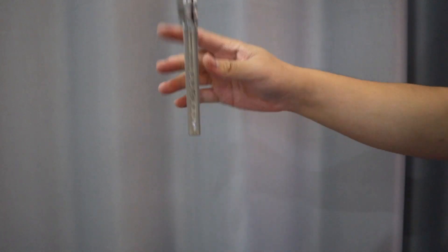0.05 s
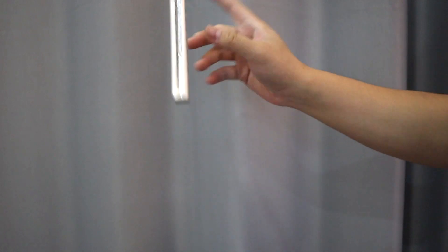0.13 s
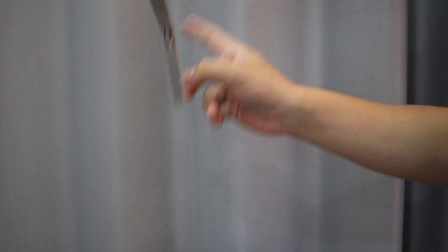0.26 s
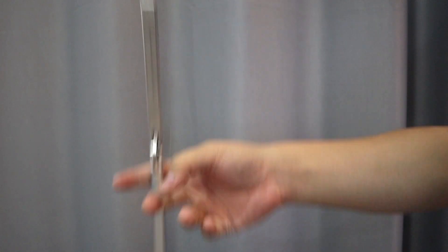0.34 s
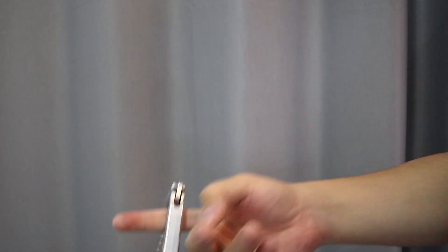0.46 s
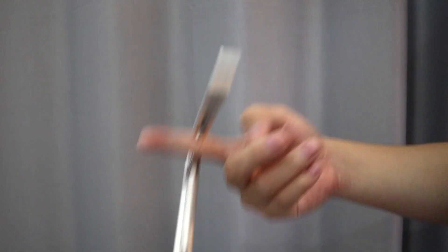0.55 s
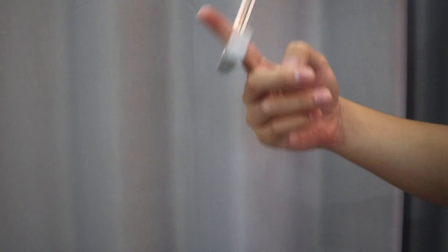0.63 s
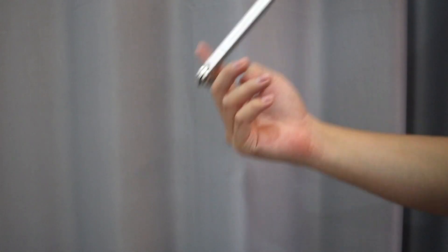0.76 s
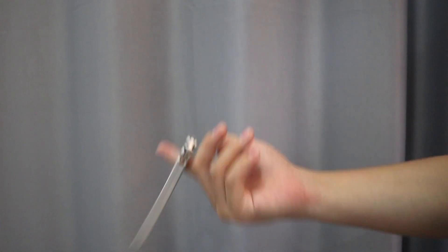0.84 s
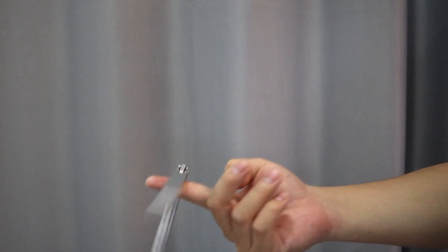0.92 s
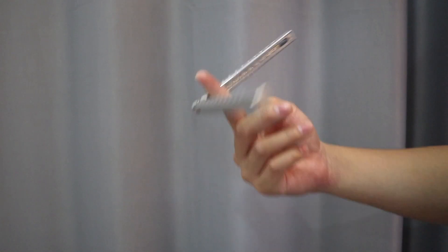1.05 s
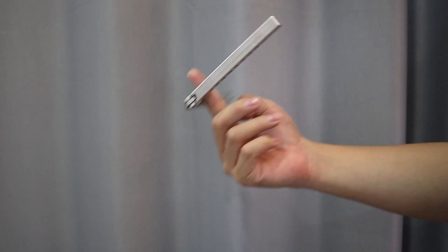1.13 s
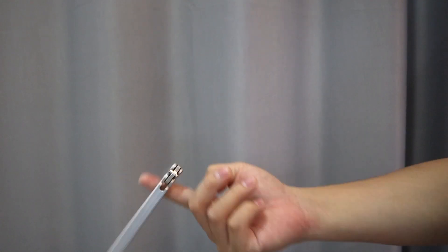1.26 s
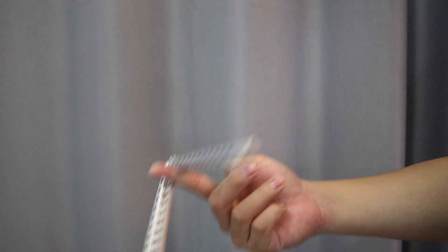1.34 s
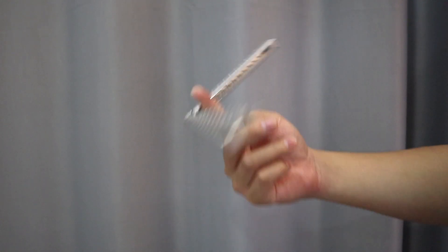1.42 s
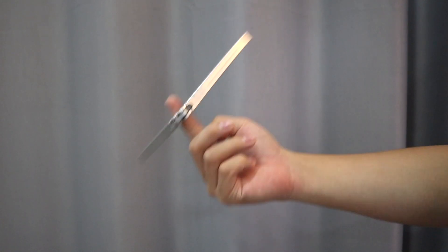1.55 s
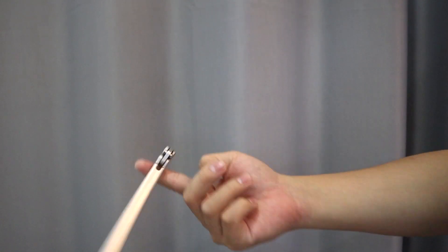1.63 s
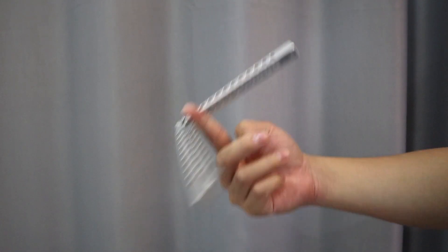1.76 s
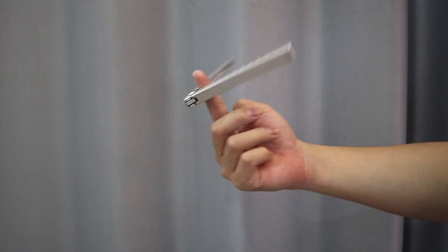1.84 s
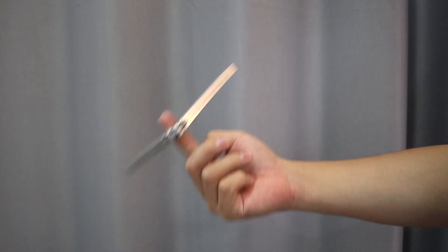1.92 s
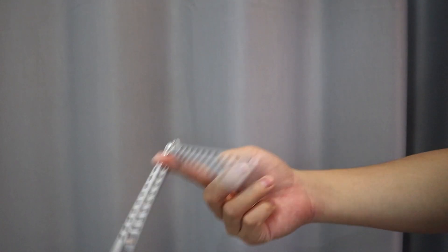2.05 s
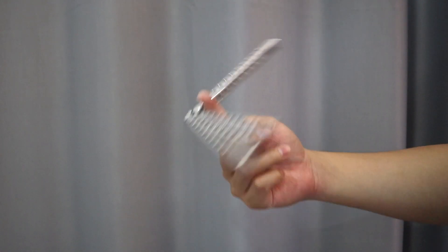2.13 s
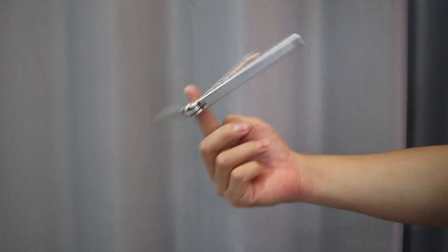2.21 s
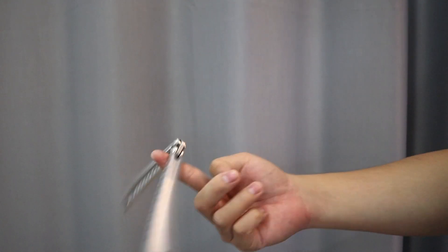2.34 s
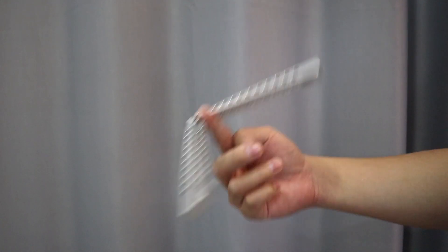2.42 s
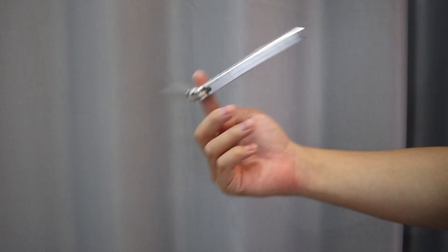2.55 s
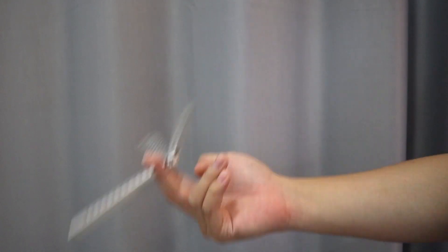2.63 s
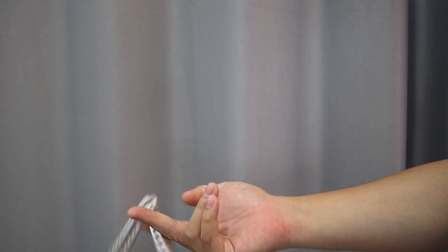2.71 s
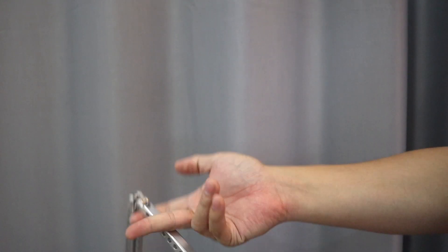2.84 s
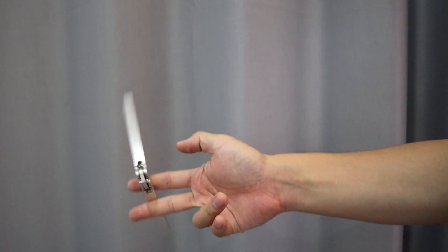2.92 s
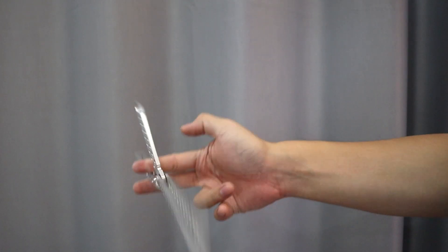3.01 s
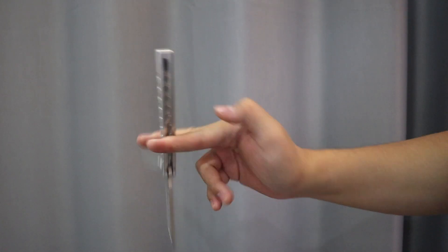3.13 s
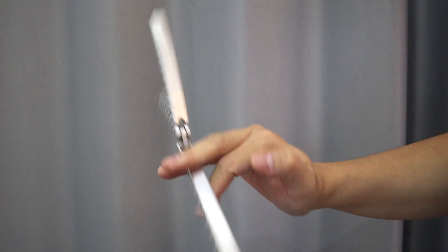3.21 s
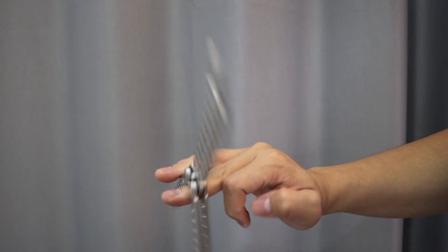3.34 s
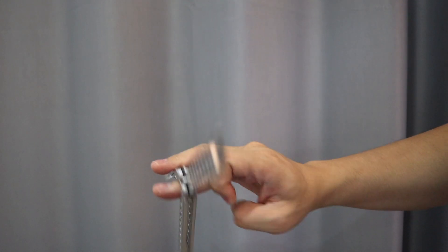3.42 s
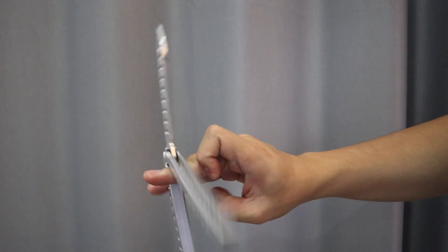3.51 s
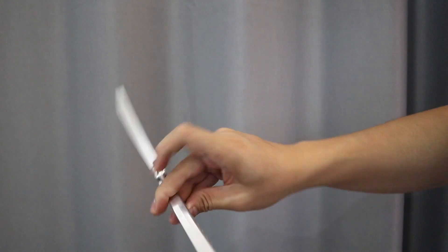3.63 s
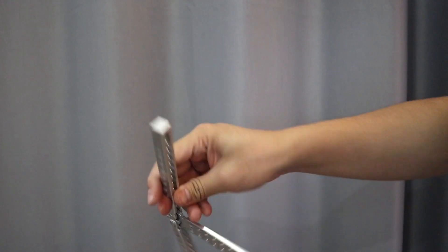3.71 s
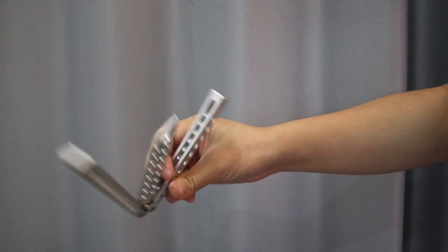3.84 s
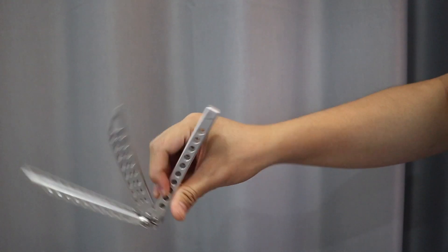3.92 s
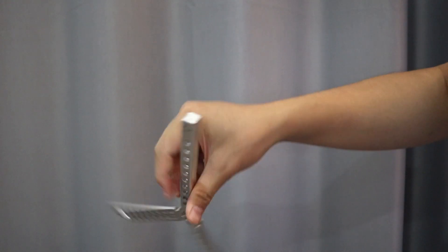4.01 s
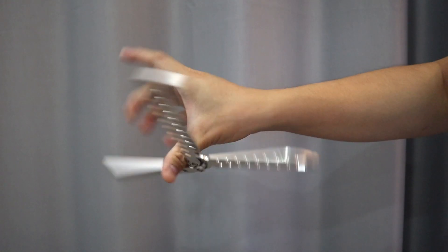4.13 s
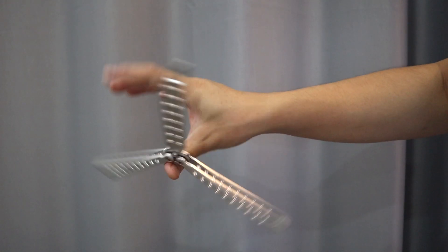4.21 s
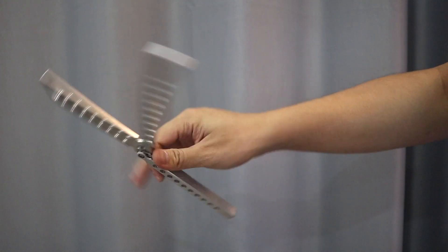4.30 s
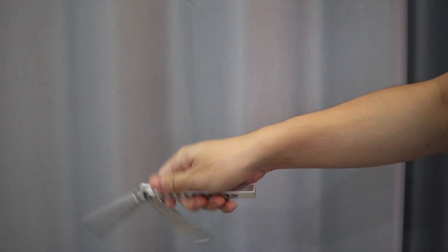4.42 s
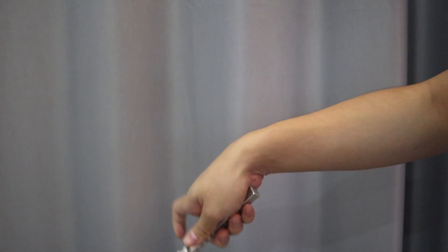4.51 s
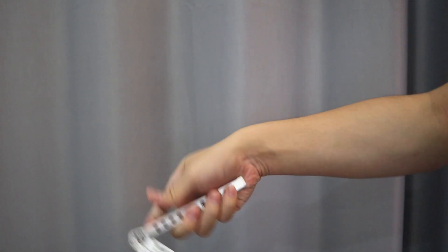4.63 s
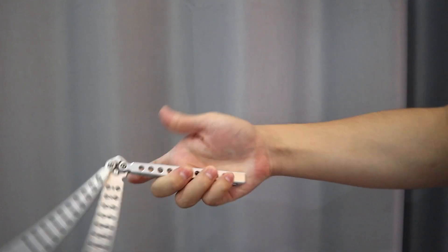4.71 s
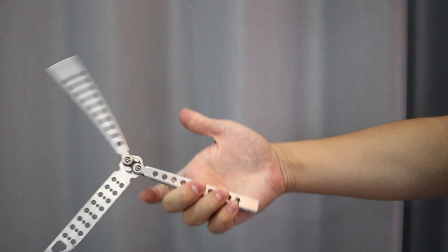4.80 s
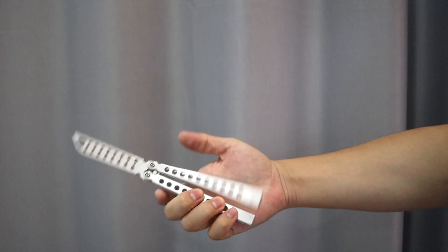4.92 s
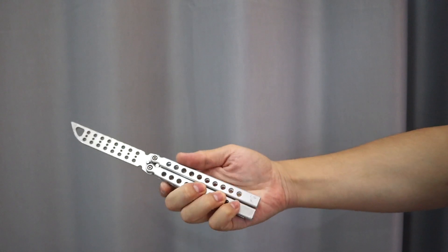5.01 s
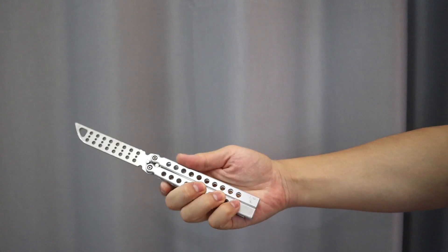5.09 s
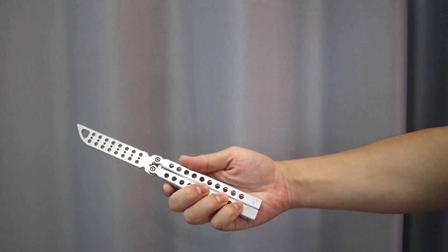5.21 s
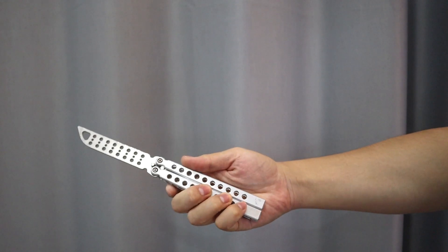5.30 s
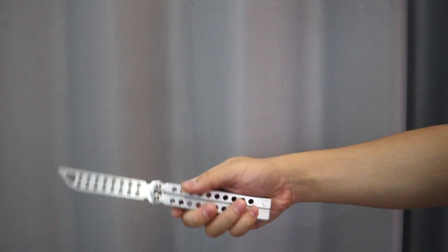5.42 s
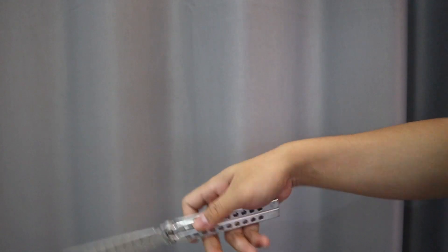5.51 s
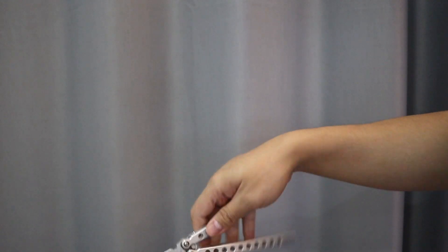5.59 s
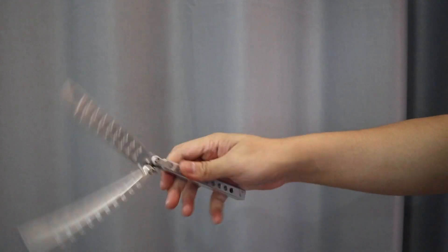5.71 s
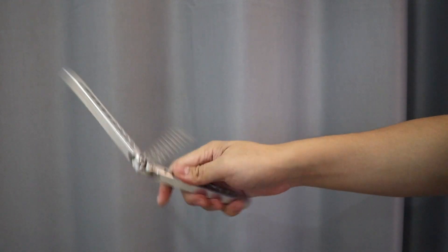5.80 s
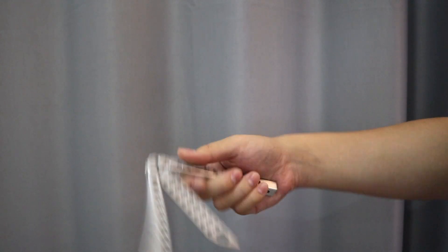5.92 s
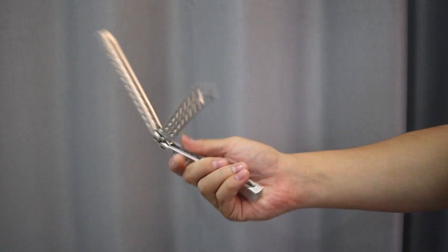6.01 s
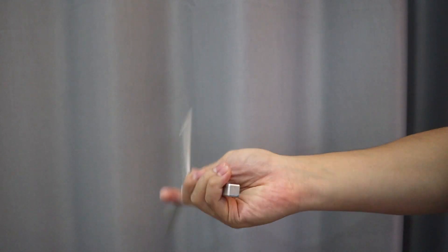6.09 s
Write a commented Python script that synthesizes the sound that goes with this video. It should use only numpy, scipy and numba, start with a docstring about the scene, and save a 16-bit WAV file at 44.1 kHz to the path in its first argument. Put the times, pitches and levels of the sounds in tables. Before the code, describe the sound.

Close, dry metallic clatter in a curtained room: handles, blade and pins of a folding knife strike with crisp clacks and very short high rings, pivots jingling loosely between. Loud hits alternate with faint ticks and gaps. A soft airy swish precedes later clicks, a clattering close settles near five seconds, and quieter clacks end it. The background is low rumbling air, wavering hum and hiss, ducking under the loudest hits.

```python
"""A curtained room, where a steel folding knife is spun round a finger close to a camera.
Handles, blade and stop pins strike each other and ring as sums of damped modes; loose pivots rattle.
The room prolongs the ring with a tail of decaying noise bands.
Behind lie a fan hum (a wavering sine), far traffic, airy swishes and hiss (filtered noise).
The camera's limiter ducks everything at loud clacks."""
import sys
import numpy as np
from scipy import signal
from scipy.fft import rfft, irfft
from scipy.io import wavfile
from scipy.ndimage import uniform_filter1d
from numba import njit

SR = 44100
rng = np.random.default_rng(int(sys.argv[2]) if len(sys.argv) > 2 else 0)


def unload_audio(sound):
    """Save the sound as a 16-bit wav file, at the path given as the first command line argument."""
    columns = np.transpose(np.atleast_2d(sound))
    # keep every value between -1 and 1, then stretch to whole-number steps
    steps = np.round(np.clip(columns, -1, 1) * 32767)
    wavfile.write(sys.argv[1], SR, steps.astype(np.int16))


N = 271215  # samples

# Vibration modes of the knife, one list per part: finger-damped knock, handle bending, blade bending,
# bright ring of the handles, pins and drilled webs.
# (frequency [Hz], relative level [dB], 60 dB decay time before stretching [s])
PART_MODES = [
    [(700, -12, .005), (1300, -2, .008), (1550, 0, .008), (2200, -10, .006)],
    [(3050, -5, .012), (3380, 0, .018), (3500, -1, .02), (3800, -5, .012), (4200, -8, .012)],
    [(4500, -8, .008), (5100, -3, .014), (5420, 0, .022), (5750, -3, .014), (6200, -12, .008),
     (6900, -12, .01)],
    [(7630, -18, .02), (8470, 0, .035), (8550, -2, .035), (8800, -16, .015)],
    [(9600, -8, .02), (10600, -5, .02), (11530, -4, .025), (12560, -3, .025), (12880, 0, .03),
     (14500, -6, .02), (15050, -5, .02)],
]
# Noise band of each part's grating contact: (lower edge [Hz], upper edge [Hz])
PART_BANDS = [(1100, 1900), (2800, 4400), (4700, 6300), (7500, 9300), (9300, 13800)]
CHATTER_MS, FREE_CHATTER_MS = 1.3, 3.5  # in a full grip; added as the handles come free
BLOW_TRIM_DB = -5.0


def blows():
    """Impact excitation: a chatter of contacts drives the modes; a free part rings, a gripped one grates."""
    out = np.zeros(N + SR)
    t = np.arange(SR // 12) / SR
    starts, levels, freedoms, _ = strikes()
    mode_chance = rng.standard_normal((len(starts), len(PART_MODES), 8, 2))
    bounces = rng.random((len(starts), 12, 2))
    grit = [level(band(rng.standard_normal(N + SR), *edges), 0) for edges in PART_BANDS]
    first = SR // 250  # levels refer to the first 4 ms
    build_up = 1 - np.exp(-t / 0.00029)  # contact takes a moment to build
    for at, parts, freedom, chances, bounce in zip(starts, levels.T, freedoms.T, mode_chance, bounces):
        chatter_s = np.clip(CHATTER_MS + FREE_CHATTER_MS * freedom[0], .5, 6) / 1000
        delay, strength = bounce.T
        contact_at = (delay * 2 * chatter_s * SR).astype(int)
        contact_gain = (2 * strength - 1) * np.exp(-1.5 * delay)
        for db, modes, chance, noise, free in zip(parts, PART_MODES, chances, grit, freedom):
            contacts = np.zeros(len(t))
            contacts[contact_at] = contact_gain * (1 - free)
            contacts[0] = 1
            tone = free * signal.fftconvolve(contacts, ring(modes, t, 2.92 * free, chance))[:len(t)]
            scrape = 0.49 * (1 - free) ** 2 * np.exp(-t / (1.9 * chatter_s))
            click = 1.13 * np.exp(-t / 0.00043)
            grate = noise[at:at + len(t)] * (scrape + click)
            hit = (tone + grate) * build_up
            out[at:at + len(t)] += undb(db + BLOW_TRIM_DB) * hit / np.sqrt(np.mean(hit[:first] ** 2))
    # so small a body radiates little bass
    return signal.sosfilt(signal.butter(2, 500, "highpass", fs=SR, output="sos"), out[:N])


def ring(modes, t, stretch, chance):
    """Modal superposition: damped sines, each a little off pitch and level as the grip changes."""
    hz, db, t60 = np.transpose(modes)[:, :, None]
    pitch_chance, level_chance = chance[:len(modes), :1], chance[:len(modes), 1:]
    pitch_spread, spread_db = .002, 2.8
    waves = np.sin(2 * np.pi * hz * (1 + pitch_spread * pitch_chance) * t)
    decay = np.exp(-np.log(1000) * t / (t60 * stretch))
    gains = undb(db + spread_db * level_chance)
    return np.sum(gains * waves * decay, axis=0) / np.sqrt(np.sum(undb(db) ** 2))


# Blows of the knife; levels are relative and are trimmed or combined when played:
# (time [s], knock level [dB], handle bending level [dB], bright ring level [dB],
#  freedom to ring [0-1], jangle level against the blow [dB])
BLOW_TABLE = [(0.355, -52, -36, -61, 0.6, -24), (0.3856, -45, -25, -29, 0.36, -25),
              (0.39, -41, -26.5, -23.5, .3, -5), (0.4159, -50, -42, -48, 0.4, -19),
              (0.4322, -22.5, -11, -7.5, 0.31, -30), (0.513, -55, -50, -38, .25, -24),
              (0.5517, -22, -21, -22, 0.46, -40), (0.5572, -26, -20, -33, 0.3, -34),
              (0.5711, -34, -17, -24, 0.1, -31), (0.5801, -16, 0, 7, 0.47, -25),
              (0.605, -45, -26, -8, 0.22, -20), (0.645, -57, -44, -21.5, 0.83, -9),
              (0.655, -51, -31, -24, 0.27, -7), (0.8002, -45, -16.5, -4, 0.52, -50),
              (1.1788, -29, -33, -38.5, 0.8, -11), (1.4619, -39, -19, -18.5, 0.21, -17),
              (1.5448, -42, -27.5, -24, 0.25, -11), (1.6367, -57, -35.5, -36, 0.5, -15),
              (1.6662, -45, -23.5, -25.5, 0.21, -4.5), (1.6836, -53, -9.5, -1, .63, -46),
              (1.7002, -67, -40, -15.5, 0.27, 2.5), (1.8227, -41, -34, -33, 0.2, -17),
              (1.8321, -40, -25.5, -23.5, 0.52, -15), (1.902, -46, -31.5, -21, 0.33, -33),
              (2.0034, -37, -31, -20, 0.2, -24), (1.9875, -56, -46, -37, 0.2, -25),
              (2.0078, -41, -7, 0.8, 0.65, -37.5), (2.022, -53.5, -29, -14, 0.5, -25),
              (2.0303, -62, -47, -12.5, 0.67, -13.5), (2.144, -51, -39, -51, 0, -18),
              (2.1857, -38, -22.5, -21.5, 0.3, -24), (2.251, -48, -30, -32, 0.25, -25),
              (2.4036, -37, -33.5, -33, .4, -32), (2.4258, -35, -18, -10.5, 0.22, -34),
              (2.429, -33, -22, -22, .5, -20), (2.4328, -38, -3, 0.5, .5, -43),
              (2.4833, -22.5, -10, 5.5, 0.43, -22.5), (2.574, -44, -31.5, -33, 0.16, -14),
              (2.625, -37.5, -41, -38, 0.2, -13), (2.716, -36, -29, -30.5, 0.42, -15),
              (2.7374, -48, -46, -42, .3, -21.5), (2.765, -42, -30, -31, 0.2, -7),
              (2.7724, -43, -25, -35, 0.27, -12), (2.7771, -52, -11.5, -3, 0.53, -25),
              (2.8312, -51, -21, -9, .48, -34), (2.9572, -51, -38.5, -32.5, 0, -9),
              (3.059, -50, -46, -42, .25, -24.5), (3.087, -40, -44, -41, 0.2, -24.5),
              (3.2062, -13.5, -4.5, -9.5, 0.36, -25.5), (3.276, -46, -43, -23.5, 0.4, -16),
              (3.336, -43, -38, -42, .3, -19), (3.6244, -53.5, -51, -46, 0.1, -21),
              (3.823, -47, -43, -44, 0.4, -27), (3.857, -35, -32.5, -35, 0.26, -17),
              (3.882, -50, -28, -36, 0.18, -6.5), (3.9086, -51, -22.5, -24, 0.2, -37),
              (3.9144, -34, -22.5, -18, 0.26, -14.5), (4.1125, -34, -36, -32.5, .35, -29),
              (4.1803, -56, -45, -38, 0.4, -22), (4.2086, -48, -41, -38, .3, -16),
              (4.2597, -53, -26.5, -20, 0.22, -11.5), (4.2914, -41, -37, -33, 0.2, -24),
              (4.3428, -38, -30.5, -33, 0.44, -5), (4.4595, -56, -39, -34, 0.4, -23),
              (4.521, -46, -31.5, -36.5, 0.48, -6), (4.585, -29.5, -28.5, -26.5, 0.14, -5),
              (4.605, -47, -22.5, -28, 0.35, -32.5), (4.613, -42, -35, -26, 0.1, -35.5),
              (4.6219, -39, -15, -14, 0.82, -35), (4.6266, -53, -12, -10, 0.28, -16),
              (4.777, -46, -37, -44, 0.4, -11), (4.8463, -43, -38.5, -31.5, 0.15, -8),
              (4.8777, -57, -58, -43, 0.2, -21.5), (4.9338, -45, -4, -13, .83, -24),
              (4.937, -48, -21, -21, 0.3, -24), (4.9542, -48, -8.5, -29, 0.97, -23),
              (4.962, -45, -36, -29, 0.3, -21), (4.9732, -47, -27, -17, 0.05, -31),
              (4.986, -46, -11.5, -15.5, 0.66, -17), (5.0124, -44, -24, -16.5, 0.1, -19.5),
              (5.029, -54, -31, -25, 0.26, -15), (5.032, -39, -33, -30, 0.37, -4),
              (5.0963, -26.5, -7.5, -9, .15, -30), (5.105, -44, -31, -26, 0.7, -32),
              (5.469, -61, -41.5, -43, 0.2, -22), (5.4917, -59, -60, -43, 0.14, -28.5),
              (5.6167, -44.5, -32, -33, 0.3, -11), (5.629, -37, -28, -22.5, 0.19, -10),
              (5.6476, -54, -29, -22, 0.13, -21), (5.7058, -53, -40, -39, 0.14, -26),
              (5.7398, -50, -39, -34, 0.15, -32), (5.802, -51, -34, -32.5, 0.2, -22),
              (5.8266, -40, -30, -37, 0.65, -15), (5.892, -35, -39, -36.5, 0.24, -8),
              (5.9323, -27, -21, -22.5, 0.33, -7), (5.9482, -33, -14.5, -14, 0.35, -21),
              (5.9616, -23, -13, -16, 0.24, -22.5)]
BLADE_DB, PINS_DB = 2, 2  # against the handle bending and the bright ring, in a full grip
FREE_LEAD_DB = 21.5  # how far freely bending handles rise over the blade
PINS_LEAD_DB = 26.5  # how far the free bright ring rises over the pins
DULL_BLOW_DB = 17  # a ring this far under its bending leaves the upper parts gripped
PALM_DULL, PALM_DB = 0.24, -21.5  # pins lose dB per dB of knock-to-ring level above PALM_DB


def strikes():
    """Coupled excitation: blade and pins take level and freedom from the handles at each blow."""
    s, knock, bend, bright, free, jangle_db = np.transpose(BLOW_TABLE)
    upper_free = free * np.clip(0.5 + (bright - bend) / DULL_BLOW_DB, .3, 1)
    blade = bend + BLADE_DB - FREE_LEAD_DB * free
    palm_loss = PALM_DULL * np.clip(knock - bright - PALM_DB, -8, 25)
    pins = bright + PINS_DB - PINS_LEAD_DB * upper_free - palm_loss
    levels = np.array([knock, bend, blade, bright, pins])
    freedom = np.clip([free, free, free, upper_free, upper_free], .05, 1)
    return (s * SR).astype(int), levels, freedom, jangle_db


# Jangle of each part against its blow level: (level [dB])
PART_JANGLE_DB = [-2.6, -4.1, -0.61, 3.5, -0.95]
# Lengthening of each part's modal decay in the jangle: (factor [1])
PART_JANGLE_STRETCH = [0.43, .7, .7, 3.9, .55]
JANGLE_T60_S = 0.3


def rattle():
    """Random impact excitation: dense ticks of the loose pivots drive the modes and die away after a blow."""
    starts, levels, freedom, jangle_db = strikes()
    ticks = (rng.random(N) < 4000 / SR) * rng.standard_normal(N)  # about 4000 a second
    ticks *= undb(0.5 * rng.exponential(size=N))
    t = np.arange(SR // 8) / SR
    keep = np.exp(-np.log(1000) / (JANGLE_T60_S * SR))
    freedom[3] = 1.8 * freedom[3] ** 2  # a grip stills the bright ring first
    freedom[2] = 1  # the blade hangs loose even when the handles are gripped
    out = 0
    for k, (modes, stretch) in enumerate(zip(PART_MODES, PART_JANGLE_STRETCH)):
        kicks = np.zeros(N)
        np.add.at(kicks, starts, undb(levels[k] + jangle_db + PART_JANGLE_DB[k]) * freedom[k])
        shake = signal.lfilter([1], [1, -keep], kicks)
        shake = uniform_filter1d(shake, 200, origin=99)  # rises over 200 samples
        jangle = signal.fftconvolve(ticks, ring(modes, t, stretch, np.zeros((8, 2))))[:N]
        out = out + shake * level(jangle, 0)
    return out


# Reverberation of the curtained room: (frequency [Hz], 60 dB decay time [s])
ROOM_DECAY = [(500, 0.057), (3000, 0.31), (8500, 0.32), (15000, 0.14)]
ROOM_DB = -16


def room(x):
    """Diffuse reverberation: noise in octave bands, each with its own decay, fading in over 9 ms."""
    t = np.arange(int(.6 * SR)) / SR
    hz, t60 = np.transpose(ROOM_DECAY)
    tail = np.zeros(len(t))
    for centre in 500 * 2. ** np.arange(6):
        noise = band(rng.standard_normal(len(t)), centre / np.sqrt(2), min(centre * np.sqrt(2), 20000))
        band_t60 = np.interp(np.log(centre), np.log(hz), t60)
        tail += noise * np.exp(-np.log(1000) * t / band_t60)
    tail *= np.clip(t / 0.009, 0, 1)
    return signal.fftconvolve(x, tail / np.sqrt(np.sum(tail ** 2)))[:N] * undb(ROOM_DB)


# Swell of the fan hum about its mean level: (time [s], level [dB])
FAN_SWELL = [(0, 5.5), (1, -2), (2, -1), (3, -6), (4, -0.5), (5, -2.5), (6.15, 2)]
HUM_HZ, HUM_DB = 47.3, -45.5


def fan_hum():
    """Frequency and amplitude modulation: one low sine wavers in pitch and level."""
    phase = np.cumsum(2 * np.pi * HUM_HZ * (1 + 0.013 * walk(4.3)) / SR)
    swell = undb(HUM_DB + curves(FAN_SWELL)[0])
    return np.sqrt(2) * swell * (1 + .4 * walk(11)) * np.sin(phase)


# Far traffic: (time [s], rumble level [dB], roar level [dB])
TRAFFIC_SWELL = [(0.0, -37.5, -41), (0.36, -40, -43), (0.74, -49, -47.5), (1.05, -41.5, -39.5),
                 (1.14, -43.5, -41.5), (1.22, -45, -36), (1.69, -48, -47), (2.28, -48.5, -48.5),
                 (2.42, -47.5, -46), (2.84, -48.5, -50.5), (3.32, -54.5, -51.5), (3.7, -45, -48.5),
                 (4.02, -50.5, -48), (4.31, -38, -45), (4.47, -44.5, -41.5), (4.88, -42, -45.5),
                 (5.04, -50, -51), (5.21, -43, -48.5), (5.5, -47.5, -47), (5.95, -39.5, -43.5),
                 (6.15, -42.5, -44.5)]
# Quick wavering of rumble, roar, hiss and top hiss: (spread [dB])
BAND_FLICKER_DB = [1.1, 1.8, 1.5, 1.1]
ROAR_HISS_DB = -6.5  # hiss against the roar
TOP_HISS_DB = -61  # steady part of the top hiss
SWISH_TOP_DB = -24  # swish in the top band against the hiss band


def traffic_and_swishes():
    """Amplitude-modulated noise: three bands follow the traffic, the upper two also the swishes; the top band
    is otherwise steady."""
    rumble, roar = undb(curves(TRAFFIC_SWELL))
    swell = swish()
    hiss = roar * undb(ROAR_HISS_DB) + swell
    top = undb(TOP_HISS_DB) + undb(SWISH_TOP_DB) * swell
    edges_hz = [(80, 322), (480, 1880), (1700, 5280), (6000, 10600)]
    out = np.zeros(N)
    for edges, gain, flicker_db in zip(edges_hz, [rumble, roar, hiss, top], BAND_FLICKER_DB):
        noise = level(band(rng.standard_normal(N), *edges), 0)
        out += noise * gain * undb(flicker_db * walk(14))
    return out


# Airy swishes: (time of the crest [s], level [dB], half length to 1/e [s])
SWISH_SWELLS = [(0.01, -50, 0.042), (0.517, -55, 0.11), (1.067, -43.5, 0.032), (1.31, -51, 0.14),
                (3.69, -58, 0.034), (4.392, -40, 0.052), (6.104, -57.5, 0.15)]


def swish():
    """Gaussian envelopes: bell-shaped swells of air."""
    t = np.arange(N) / SR
    return sum(undb(db) * np.exp(-((t - s) / half) ** 2) for s, db, half in SWISH_SWELLS)


# Spectrum of the steady air noise: (frequency [Hz], relative density [dB per Hz])
AIR_SPECTRUM = [(35, -37), (60, -2.5), (91, 10), (274, -2.5), (503, -16), (666, -1.5), (1620, -39.5),
                (2050, -28), (5330, -30.5), (8510, -41), (16000, -46.5)]
AIR_DB = -51.5


def air_noise():
    """Spectral shaping: steady noise is coloured in the frequency domain."""
    return level(band(colour(rng.standard_normal(N), AIR_SPECTRUM), 60, 17700), AIR_DB)


def microphone_hiss():
    """Electrical self-noise: steady noise confined to 8-16 kHz, at -69 dB."""
    return level(band(rng.standard_normal(N), 8000, 16000), -69)


def undb(db):
    """Logarithmic level: the amplitude gain of a level in dB."""
    return 10 ** (np.asarray(db) / 20)


def level(x, db):
    """Root-mean-square level: scales a signal to it."""
    return x * undb(db) / np.sqrt(np.mean(x ** 2))


def colour(x, points):
    """Spectral weighting by (frequency [Hz], level [dB]) points joined on a log axis."""
    hz, db = np.transpose(points)
    f = np.maximum(np.fft.rfftfreq(len(x), 1 / SR), 1)
    return irfft(rfft(x) * undb(np.interp(np.log(f), np.log(hz), db)), len(x))


def band(x, lo_hz, hi_hz):
    """Band-pass filtering with a Butterworth response."""
    return signal.sosfilt(signal.butter(3, [lo_hz, hi_hz], "bandpass", fs=SR, output="sos"), x)


def curves(table):
    """Linear interpolation: columns of a timed table as one value per sample."""
    s, *columns = np.transpose(table)
    return [np.interp(np.arange(N) / SR, s, c) for c in columns]


def walk(rate_hz):
    """Smoothed random modulation: levels held 1 / rate, averaged twice; spread near 1."""
    k = int(SR / rate_hz)
    held = np.repeat(rng.standard_normal(N // k + 1), k)
    return 1.3 * uniform_filter1d(uniform_filter1d(held, k), k)[:N]


def scene():
    """Superposition of the knife, its reverberation and the background."""
    knife = blows() + rattle()
    background = air_noise() + fan_hum() + traffic_and_swishes() + microphone_hiss()
    return (knife + room(knife) + background)[None]


@njit
def limit(x, top, attack, hold, release):
    """Peak limiting: an envelope above the top lowers the gain, holds a while and lets it return."""
    y, envelope, wait = np.empty(len(x)), 0., 0.
    for i in range(len(x)):
        a = abs(x[i])
        if a > envelope:
            envelope, wait = envelope + (a - envelope) * attack, hold
        elif wait > 0:
            wait -= 1
        else:
            envelope += (a - envelope) * release
        y[i] = x[i] * min(1., top / (envelope + 1e-9))
    return y


LIMIT_TOP = 0.35  # of full scale
LIMIT_ATTACK_S, LIMIT_HOLD_S, LIMIT_RELEASE_S = 0.0026, 0.035, 0.022
TOP_HZ = 16250


def record(dry):
    """Gain reduction, clipping of peaks that outrun it, and an elliptic low-pass."""
    held = limit(dry[0], LIMIT_TOP, 1 / (LIMIT_ATTACK_S * SR), LIMIT_HOLD_S * SR, 1 / (LIMIT_RELEASE_S * SR))
    clipped = np.clip(held, -1.1, 1.1)
    cut = signal.sosfilt(signal.ellip(10, .2, 70, TOP_HZ, fs=SR, output="sos"), clipped)
    return np.clip(cut, -1, 1)[None]


dry = scene()
out = record(dry)
unload_audio(out)
```